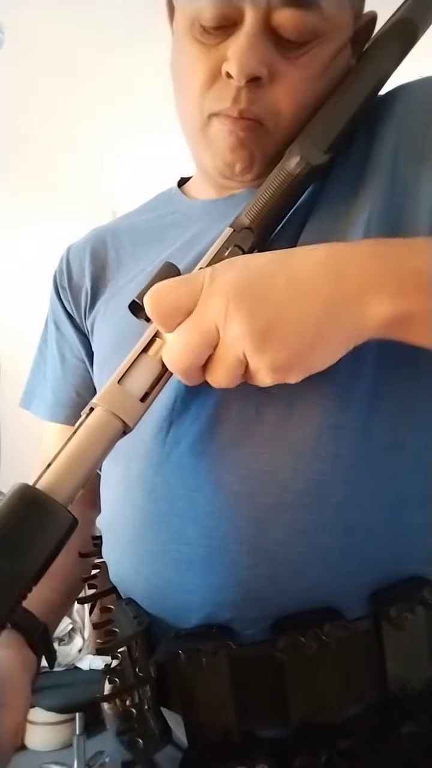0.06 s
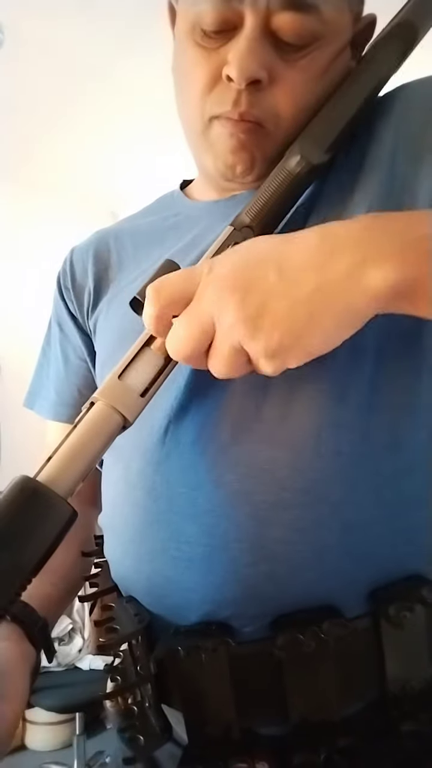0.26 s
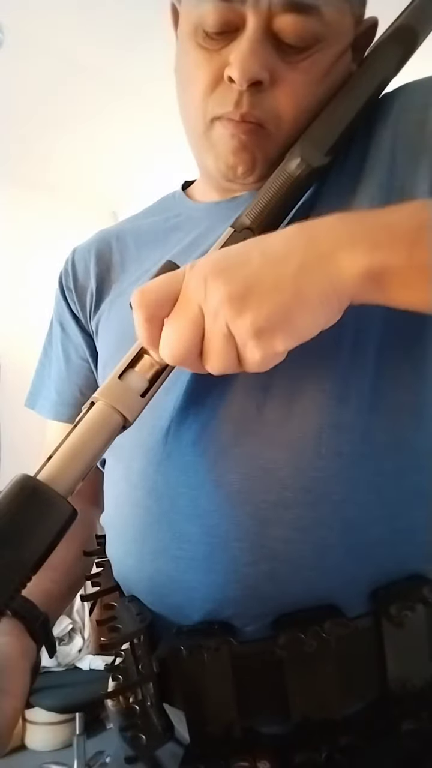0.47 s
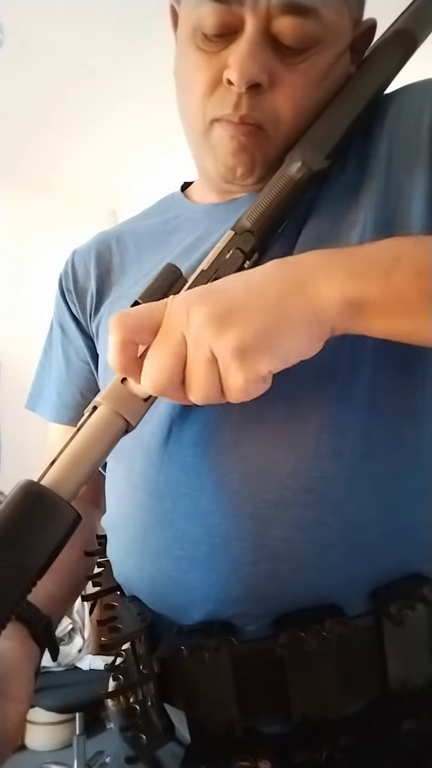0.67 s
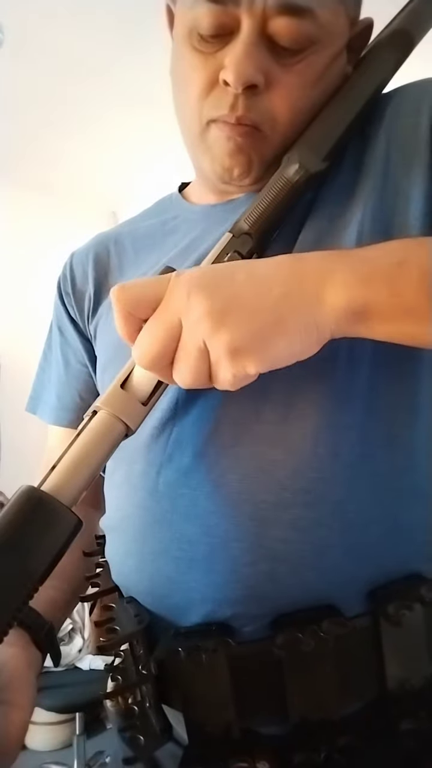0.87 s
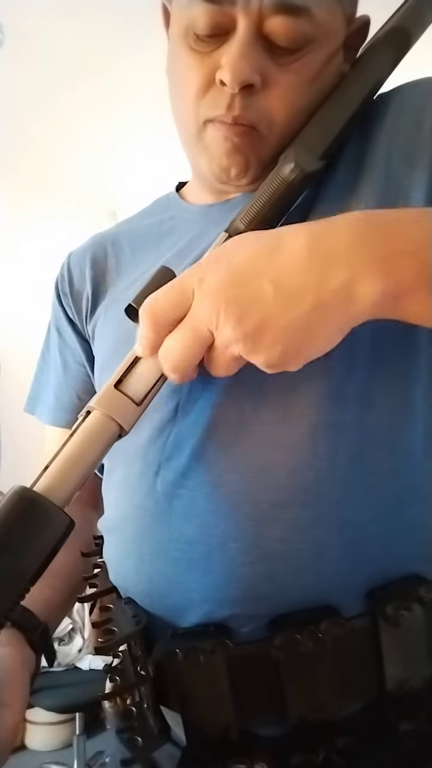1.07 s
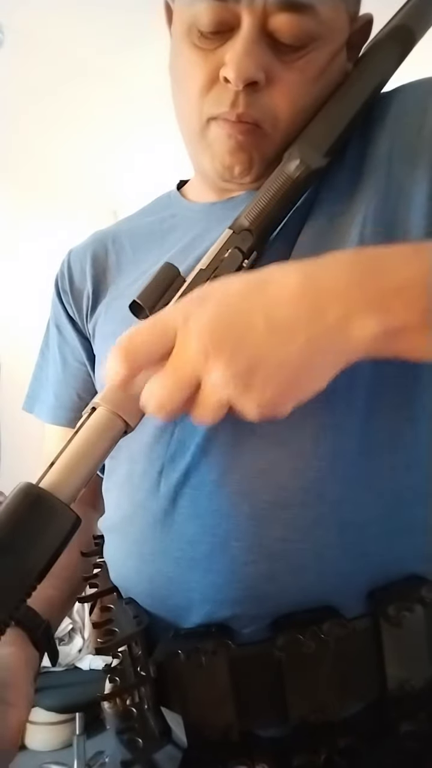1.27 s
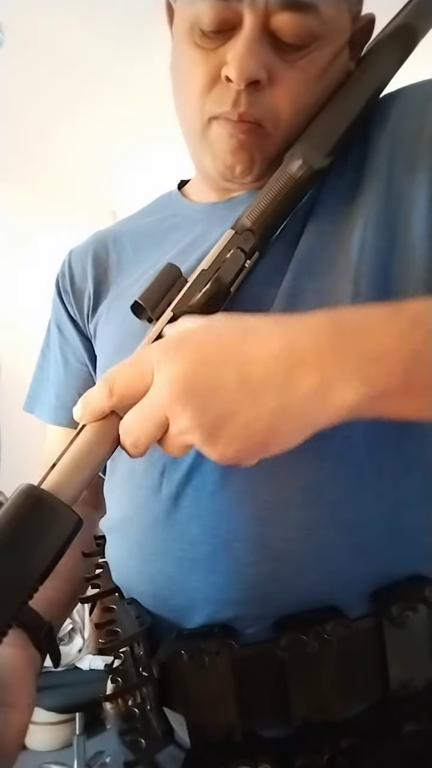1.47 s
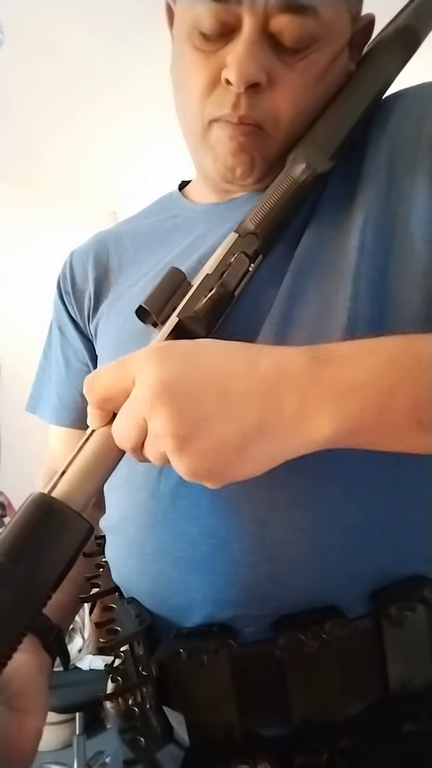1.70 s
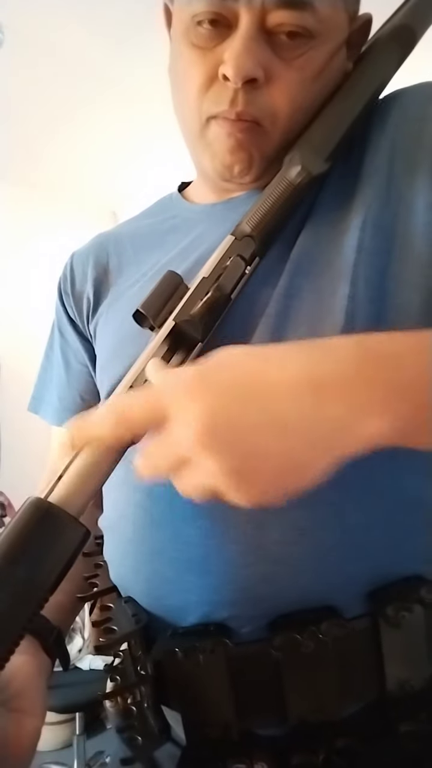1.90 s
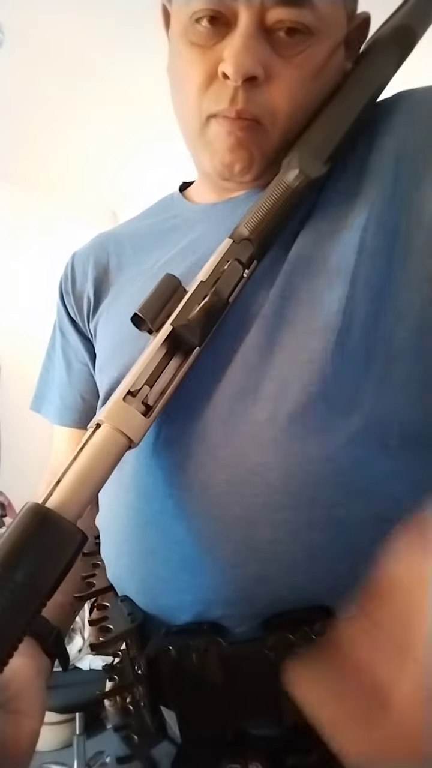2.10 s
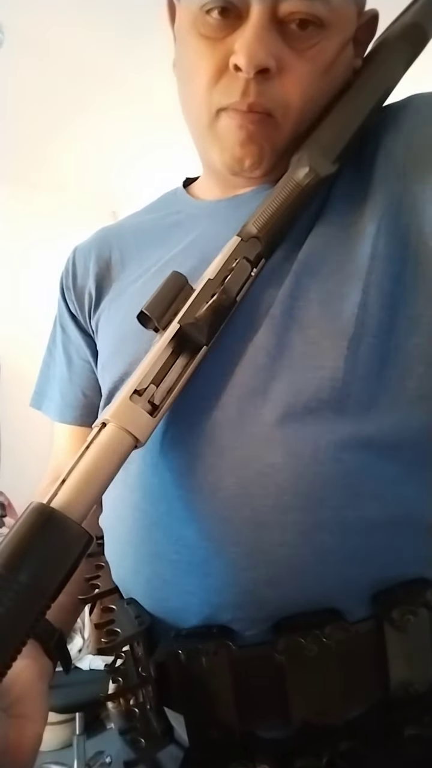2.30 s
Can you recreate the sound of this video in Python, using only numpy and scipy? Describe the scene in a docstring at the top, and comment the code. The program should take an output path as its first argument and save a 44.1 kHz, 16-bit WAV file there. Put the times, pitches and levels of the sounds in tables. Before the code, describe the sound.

Sharp steel clicks and clacks of a shotgun's action being worked by hand indoors.

```python
"""Steel ticks and sharp clacks, close up: a man works a shotgun's action with his thumb in a hard-walled
room. Parts slide with a short bright rasp and snap against their stops; the receiver, the hollow body,
a latch and a spring ring briefly, and the room answers. The hand rubs on the gun, and at the end bumps
dully against the phone that holds the microphone. Underneath are the dying echo of an earlier knock,
a faint low hum and still air."""
import sys
import numpy as np
from scipy import signal
from scipy.fft import rfft, irfft
from scipy.io import wavfile
from scipy.ndimage import uniform_filter1d

SR = 44100
rng = np.random.default_rng(int(sys.argv[2]) if len(sys.argv) > 2 else 0)


def log_audio(samples):
    """Write samples as a 16-bit WAV file to the path given in sys.argv[1]."""
    # one column per channel
    frames = np.atleast_2d(samples).T
    # limit to full scale, then quantise
    limited = np.clip(frames, -1, 1)
    pcm = np.round(limited * 32767).astype(np.int16)
    wavfile.write(sys.argv[1], SR, pcm)


N = 108045

# Steel parts striking; the last four columns shape the tone against the 2.4-4.2 kHz band:
# start_s, level_db, thump_db, knock_db, bright_db, sizzle_db
STRIKES = [(0.028, -32.5, -21, 14.5, -8, -18.5), (0.1222, -40, -4, -9, -2, -2),
           (0.2001, -13.5, 0, 3.5, -11, -6), (0.2093, -8, -10, 0, -2.5, -11.5),
           (0.334, -37, -4, 13.5, -24, -30.5), (0.412, -36, -28, 1, -19, -18),
           (0.4416, -19.5, -3, 8, 18, 10.5), (0.461, -6, -3.5, 1, -7.5, 2.5),
           (0.544, -16, -19, 4.5, -13, -18), (0.5627, -2.5, -44, -9.5, -9, -15),
           (0.566, -21, -3, 17.5, 10, 6), (0.5715, -21, -13, 14, -1, 1), (0.5808, -6, 7, 6.5, 7, 1.5),
           (0.758, -29.5, -33, 1, -1, -1), (0.7744, -22.5, -30, 5.5, -13, -37),
           (0.7793, -17, -7, 8.5, -10, -20), (0.7883, -28, -8.5, 13, 13, 1), (0.7969, -8, 15, 6.5, 6, 3),
           (0.8689, -23, -19, -7, -15, -4), (0.8725, -13, -12.5, 2.5, -1, 1.5),
           (0.979, -30.5, -10, 9, -32, -24.5), (1.039, -35, -11, 5, -0.5, -0.5),
           (1.0767, -27, -10.5, 20, -1.5, -6), (1.081, -22.5, -18, 9.5, -14.5, -16),
           (1.0953, -20, -16.5, 1, -6.5, -1), (1.1158, -26, -14.5, 10.5, -7.5, -19),
           (1.16, -6.5, -22.5, -1.5, -3.5, -15.5), (1.2524, -18.5, -30, 1, -10.5, -26.5),
           (1.3661, -18, -33, -0.5, -16.5, -23), (1.371, -13.5, -24, 6, -11, -19.5),
           (1.462, -25, -13.5, 7.5, -10, -14.5), (1.498, -17.5, -19, -14.5, -20.5, -24),
           (1.5258, -13.5, -9, -5, -1.5, 2.5), (1.5486, -5, -23, -2.5, -6.5, -8.5),
           (1.5752, -12.5, -19.5, 3, -6.5, -8.5), (1.6125, -7.5, -1, -0.5, -2, 1.5),
           (1.6164, -9, 10, 5, 0, -2), (1.6414, -20.5, 1.5, -6.5, 8, 14), (1.658, -20, -11.5, -4, 4.5, 7.5),
           (1.759, -31, -13, 5, -15.5, -17.5), (1.7925, -9, 6.5, 3, 5, -0.5),
           (1.799, -18, 16, -5, -3.5, -5.5), (2.363, -40.5, 21, 18, -5.5, -2.5)]
# Tone shared by the cracks of all strikes: frequency_hz, gain_db
CRACK_EQ = [(30, -34), (90, -16.5), (300, -9.5), (420, -11), (620, -5), (860, -12.5), (1060, 2),
            (1330, -6.5), (2000, -2), (2650, 7.5), (3200, 0.5), (3900, 6), (4700, 0.5), (5400, 2.5),
            (7200, 0), (8400, -7.5), (9600, -17), (11000, -19.5), (11800, -13), (12800, -14),
            (15500, -17.5)]
# Modes of the gun's hollow body: pitch_hz, level_db, t60_s
BODY_MODES = [(642.6, -16, 0.06), (1066.3, 1.5, 0.049), (1530, -10, 0.049), (1731, -8.5, 0.034)]
# Steel sliding on steel: start_s, rise_s, end_s, level_db, shudder_db, sing_db
SLIDES = [(0.422, 0.023, 0.46, -13.5, -5, -0.5), (0.544, 0.02, .589, -14.5, 1, -8.5),
          (1.52, 0.011, 1.545, -11, 0.5, -17)]
# Bright tone of the slides: frequency_hz, gain_db
RASP_EQ = [(30, -28), (150, -9.5), (600, -9), (1500, -4.5), (2400, 0.5), (3500, 0.5), (4400, 2.5),
           (4800, -4.5), (6300, 2.5), (7300, 5.5), (8400, -5.5), (9300, -17.5), (10800, -15.5),
           (11800, -5.5), (12700, -13), (13300, -6), (15500, -11)]
# Modes of the steel receiver: pitch_hz, level_db, t60_s
RECEIVER_MODES = [(1010, -3.5, 0.025), (1602, -5, 0.062), (2350, -2.5, .05), (2740, -13.5, .04),
                  (3780, -3.5, 0.096), (4700, -5, .12), (5980, -3, 0.027), (6350, -6.5, 0.056),
                  (7300, 1.5, 0.015), (7900, -6.5, .05)]
# The sprung latch snapping over: start_s, level_db
LATCH_SNAPS = [(.2096, 9.5), (1.159, 7.5), (1.6128, -1.5), (1.7925, 2.5)]
# Modes of the latch: pitch_hz, level_db, t60_s
LATCH_MODES = [(990, -14.5, 0.012), (2450, -3.5, .012), (2720, -1.5, 0.018), (3804, -7.5, 0.054),
               (5186, 3.5, 0.011)]
# A spring set ringing by the harder strokes: start_s, level_db
SPRING_PINGS = [(0.199, -51), (.445, -42.5), (.58, -40.5), (1.536, -43), (1.615, -42.5)]
# The hand rubbing on the gun: start_s, rise_s, length_s, level_db, room_send_db
RUBS = [(0.397, .01, 0.025, -36, -19), (1.114, .008, 0.038, -32, 9.5), (1.468, 0.027, 0.048, -30.5, 19),
        (2.276, 0.0022, 0.024, -42, -26.5), (2.343, 0.0079, 0.035, -46.5, -15),
        (2.372, .035, .1, -43.5, -39.5)]
# Soft tone of the rubs: frequency_hz, gain_db
RUB_EQ = [(40, -26.5), (300, -14), (600, -6.5), (1000, 0.5), (1500, -0.5), (2400, 0), (4000, -0.5),
          (5000, -5.5), (7500, -10.5), (9500, -24.5), (15000, -26.5)]
# Dull bumps of a finger against the phone: start_s, level_db
BUMPS = [(2.365, -27.5), (2.4445, -11)]
# Reverb time of the room: frequency_hz, t60_s
ROOM_DECAY = [(200, 0.33), (530, 0.5168), (1400, 0.34), (3700, 0.3644), (7000, 0.33), (13000, 0.42)]
# Tone returned by the walls: frequency_hz, gain_db
ROOM_EQ = [(60, -20.5), (200, -22), (300, -18), (420, -27), (600, -10.5), (850, -8.5), (1050, -10),
           (1500, -7.5), (2500, -8), (4000, -6), (7000, -11), (12000, -13), (16000, -18)]
# Swell and fade of the hum: time_s, level_db
HUM_LEVELS = [(0, -80), (.9, -79), (1.02, -59), (1.2, -69.5), (1.7, -71), (2.2, -74.5), (2.3, -82)]
# Tone of the still air: frequency_hz, gain_db
AIR_EQ = [(20, -17), (70, -3), (130, -4.5), (250, -13.5), (1000, -16.5), (4000, -23.5), (16000, -43)]
# Tone of the opening echo: frequency_hz, gain_db
ECHO_EQ = [(100, -23), (450, -20), (950, 2.5), (1600, -3.5), (3500, 4), (5000, -11), (7500, -15),
           (10000, -33.5)]

CONTACT_S = .0004  # attack time constant of steel meeting steel


def strikes(boost_db=18.5, touch_db=-16.5, touch_lead_s=.0027, body_db=-16.5, grip_detune=.025):
    """Parts graze, then crack against their stops; the hollow body's knock shifts pitch with the grip."""
    cracks, knocks = np.zeros(N), np.zeros(N)
    for start, db, thump, knock, bright, sizzle in STRIKES:
        level_db = db + boost_db
        tone = [(380, thump), (700, knock), (1500, knock), (2400, .006), (4200, .0085),
                (6500, bright), (8500, bright), (11500, sizzle)]
        t60 = .0125 * (1 + .012 * np.clip(-9 - db, 0, 20))  # softer hits last a little longer
        add(cracks, start - touch_lead_s, amp(level_db + touch_db) * colour(crack(t60), tone))
        add(cracks, start, amp(level_db) * colour(crack(t60), tone))
        modes = [(hz * (1 + grip_detune * rng.standard_normal()), level, decay)
                 for hz, level, decay in BODY_MODES]
        add(knocks, start, amp(level_db + knock + body_db) * ringing(modes))
    return colour(cracks, CRACK_EQ) + colour(knocks, [(200, -29.5), (600, -2.5)])


def crack(t60, chatter_db=-17, chatter_t60_s=.04, size=4096):
    """One steel contact: a few milliseconds of dense vibration, then a weaker chatter."""
    t = np.arange(size) / SR
    envelope = attack(t) * (fade(t, t60) + amp(chatter_db) * fade(t, chatter_t60_s))
    grain = rng.standard_normal(size)
    for _ in range(4):  # even out the noise across frequency, then across time
        spectrum = rfft(grain * envelope)
        flat = irfft(spectrum / np.sqrt(abs(uniform_filter1d(abs(spectrum) ** 2, size=24)) + 1e-12))
        grain = flat / np.sqrt(abs(uniform_filter1d(flat ** 2, size=64)) + 1e-16)
    return unit(grain * envelope)


def slides(sing_hz=4380, sing_q=24):
    """A part rasps along to its stop, shuddering low and singing at one narrow resonance."""
    out = np.zeros(N)
    resonance = signal.iirpeak(sing_hz, sing_q, SR)
    for start, rise, end, db, shudder_db, sing_db in SLIDES:
        stroke = amp(db) * friction(start, rise, end, release_s=.0018, catches_per_s=3200, spread_db=1.5)
        out += colour(stroke, [(450, shudder_db), (2000, 0)])
        out += 2 * amp(sing_db) * signal.lfilter(*resonance, stroke)
    return colour(out, RASP_EQ)


def friction(start, rise, end, release_s, catches_per_s, spread_db):
    """Surfaces drag in tiny catches of uneven size under one stroke."""
    t = np.arange(N) / SR
    catches = (rng.random(N) < catches_per_s / SR) * rng.choice([-1, 1], N)
    sizes = amp(spread_db * np.minimum(rng.exponential(1, N), 4))
    envelope = np.clip((t - start) / rise, 0, 1) ** 1.3 * np.exp(-np.maximum(t - end, 0) / release_s)
    return unit(catches * sizes) * np.sqrt(N) * envelope


def receiver(contacts):
    """The steel receiver adds its brief ring to whatever strikes or scrapes it."""
    ring = signal.fftconvolve(contacts, ringing(RECEIVER_MODES))[:N]
    return contacts + amp(-15) / 2 * ring


def latch():
    """The latch gives a short, hard ring each time it snaps over."""
    out, ring = np.zeros(N), ringing(LATCH_MODES)
    snap = ring * attack(np.arange(len(ring)) / SR)
    for start, db in LATCH_SNAPS:
        add(out, start, amp(db) * snap)
    return out


def spring(pitch_hz=11800, spread_hz=130, t60_s=.25, count=12):
    """The jolted spring shimmers: a thin, very high ring of many close tones."""
    out, t = np.zeros(N), np.arange(SR // 2) / SR
    for start, db in SPRING_PINGS:
        tones = np.zeros(len(t))
        for _ in range(count):
            hz = pitch_hz + spread_hz * rng.standard_normal()
            tones += np.sin(2 * np.pi * (hz * t + rng.random()))
        add(out, start, amp(db) * tones / np.sqrt(count) * fade(t, t60_s) * attack(t))
    return out


def hand_rubs():
    """Skin drags softly on the gun; returns the close sound and its room send."""
    close, send = np.zeros(N), np.zeros(N)
    for start, rise, length, db, send_db in RUBS:
        drag = friction(start, rise, start + length, release_s=.002, catches_per_s=6000, spread_db=2.5)
        close += amp(db) * drag
        send += amp(db + send_db) * drag
    return colour(close, RUB_EQ), colour(send, RUB_EQ)


def phone_bumps(pitch_hz=350, t60_s=.03):
    """A finger knocks dully on the phone: one low, damped tone."""
    out = np.zeros(N)
    for start, db in BUMPS:
        add(out, start, amp(db) * ringing([(pitch_hz, 0, t60_s)]))
    return colour(out, [(60, -26), (280, 1)])


def room(send, patterns=8):
    """Hard walls answer, crossfading between reflection patterns as the gun and the arm move."""
    position = np.linspace(0, patterns - 1, N)
    wet = np.zeros(N)
    for k in range(patterns):
        crossfade = np.sqrt(np.maximum(1 - abs(position - k), 0))
        wet += signal.fftconvolve(send * crossfade, reflections())[:N]
    return colour(wet, ROOM_EQ)


def reflections(predelay_s=.0024, build_s=.006, size=256):
    """Dense wall reflections build up, then each band dies at its own speed."""
    t = np.arange(SR * 3 // 4) / SR
    taps = rng.standard_normal(len(t)) * np.clip((t - predelay_s) / build_s, 0, 1)
    hz, times, bands = signal.stft(taps, SR, nperseg=size)
    decay = fade(times, curve_at(ROOM_DECAY, hz)[:, None])
    return unit(signal.istft(bands * decay, SR, nperseg=size)[1])


def opening_echo(gain_db=-32, t60_s=.45):
    """The tail of an earlier knock dies away in the room."""
    return amp(gain_db) * colour(rng.standard_normal(N), ECHO_EQ) * fade(np.arange(N) / SR, t60_s)


def hum(pitch_hz=141, waver_hz=4.3):
    """A faint low tone wavers in pitch, swells and sinks back."""
    t = np.arange(N) / SR
    waver = np.interp(t, np.linspace(0, t[-1], 25), rng.standard_normal(25))
    phase = 2 * np.pi * np.cumsum(pitch_hz + waver_hz * waver) / SR
    level_db = np.interp(t, *np.transpose(HUM_LEVELS))
    return np.sqrt(2) * amp(level_db) * np.sin(phase)


def air(level_db=-73.5):
    """Still air: a steady bed of dark noise."""
    return amp(level_db) * unit(colour(rng.standard_normal(N), AIR_EQ)) * np.sqrt(N)


def ringing(modes):
    """The dying tones of a struck part, in alternating polarity."""
    t = np.arange(SR // 3) / SR
    tones = [amp(db) * unit(fade(t, t60) * np.sin(2 * np.pi * hz * t)) for hz, db, t60 in modes]
    return unit(sum(tone * (-1) ** k for k, tone in enumerate(tones)))


def colour(x, eq, size=2048):
    """Minimum-phase EQ: nothing rings ahead of a transient."""
    log_gain = np.log(amp(curve_at(eq, abs(np.fft.fftfreq(size, 1 / SR)))))
    taps = np.fft.ifft(np.exp(np.conj(signal.hilbert(log_gain)))).real
    return signal.fftconvolve(x, taps[:size // 2])[:len(x)]


def curve_at(points, hz):
    """Reads a curve along log frequency."""
    frequencies, values = np.transpose(points)
    return np.interp(np.log(hz + 1), np.log(frequencies + 1), values)


def attack(t):
    """The fast rise of a steel contact."""
    return 1 - np.exp(-t / CONTACT_S)


def fade(t, t60):
    """Falls by 60 dB every t60 seconds."""
    return np.exp(-np.log(1000) * t / t60)


def amp(db):
    """Decibels to gain."""
    return 10 ** (np.asarray(db) / 20)


def unit(x):
    """Scales to an energy of one."""
    return x / np.sqrt(np.sum(x ** 2) + 1e-20)


def add(mix, start_s, sound):
    """Mixes a sound in at its cue."""
    part = mix[max(round(start_s * SR), 0):][:len(sound)]
    part += sound[:len(part)]


def scene(latch_send_db=-6.5):
    """Gun and hand up front, the room behind them and a quiet bed underneath, in mono."""
    gun, snaps = receiver(strikes() + slides()), latch()
    rubs, rub_send = hand_rubs()
    close = gun + snaps + spring() + rubs + phone_bumps()
    reverb = room(gun + amp(latch_send_db) * snaps + rub_send)
    return (close + reverb + opening_echo() + hum() + air())[None]


def record(dry, threshold_db=-57, ceiling=.78, cutoff_hz=15900, size=512):
    """A noise suppressor dips faint sound by up to 10 dB; peaks are rounded and the very top is cut."""
    frames = dict(nperseg=size, noverlap=size * 3 // 4)
    bands = signal.stft(dry, **frames)[2]
    power = abs(uniform_filter1d(uniform_filter1d(abs(bands) ** 2, size=5, axis=1), size=5, axis=2)) * size
    threshold = amp(threshold_db) ** 2
    gain = np.sqrt((power + .1 * threshold) / (power + threshold))
    cleaned = signal.istft(bands * gain, **frames)[1][:, :N]
    rounded = ceiling * np.tanh(cleaned / ceiling)
    lowpass = signal.firwin(255, cutoff_hz, window=("kaiser", 8), fs=SR)
    return signal.oaconvolve(rounded, lowpass[None], "same")


dry = scene()
out = record(dry)
log_audio(out)
```